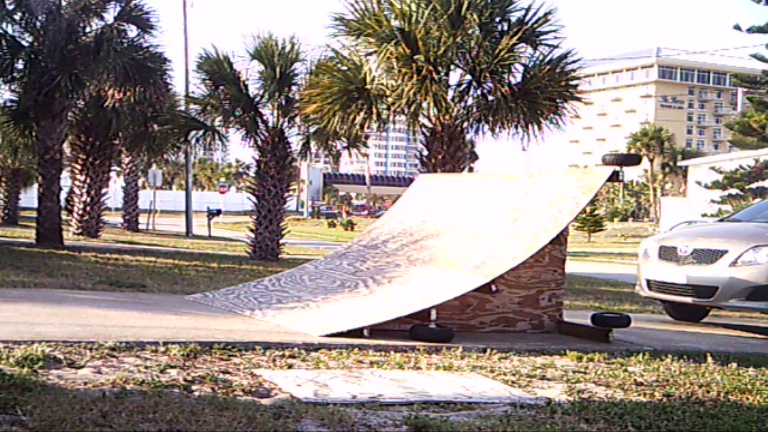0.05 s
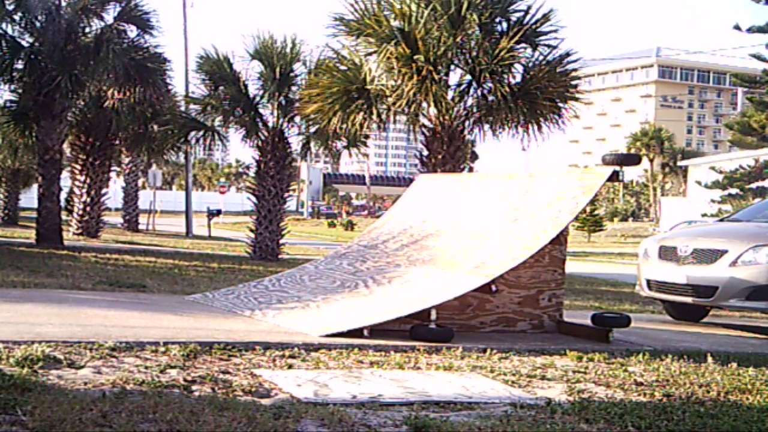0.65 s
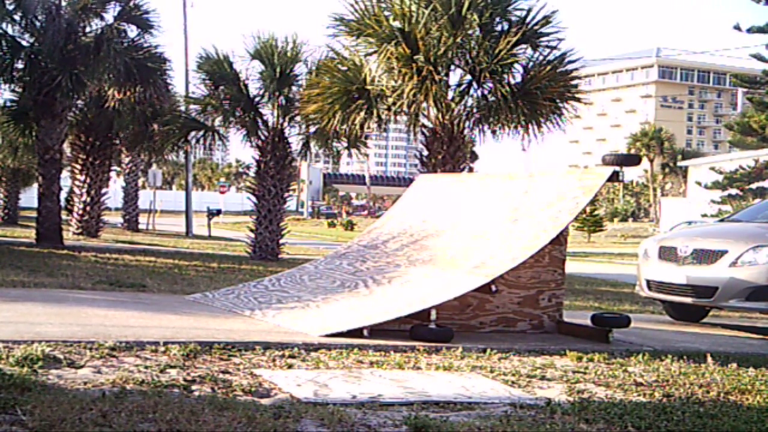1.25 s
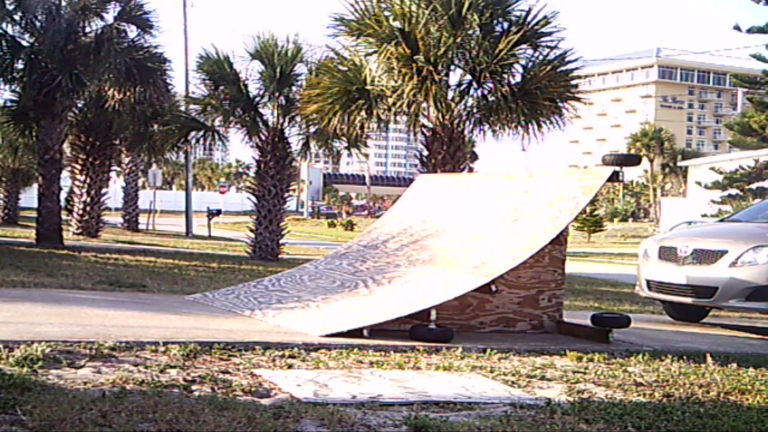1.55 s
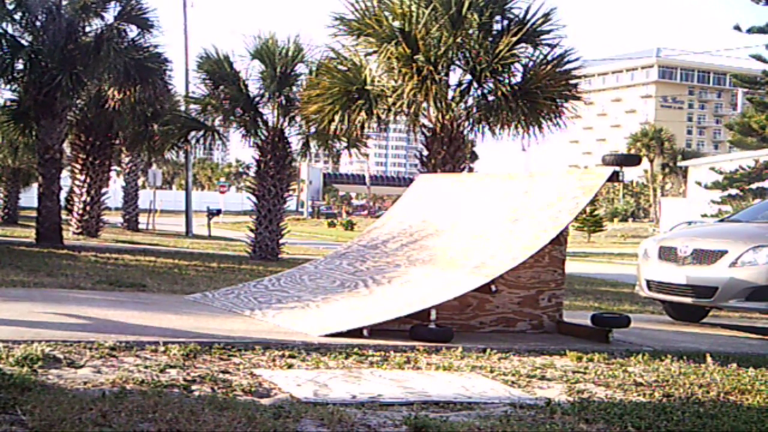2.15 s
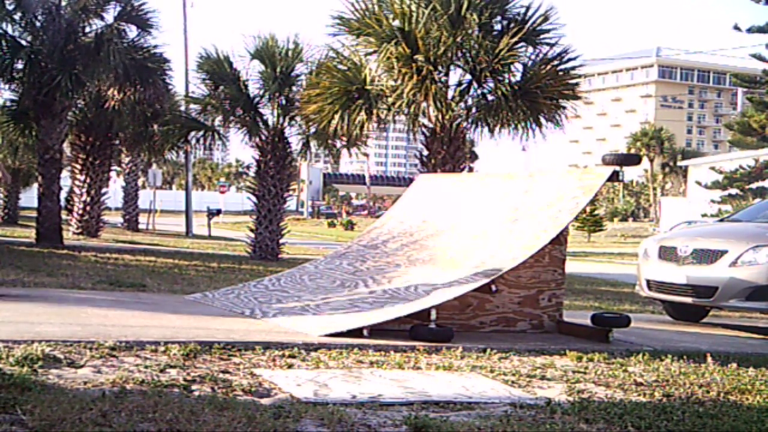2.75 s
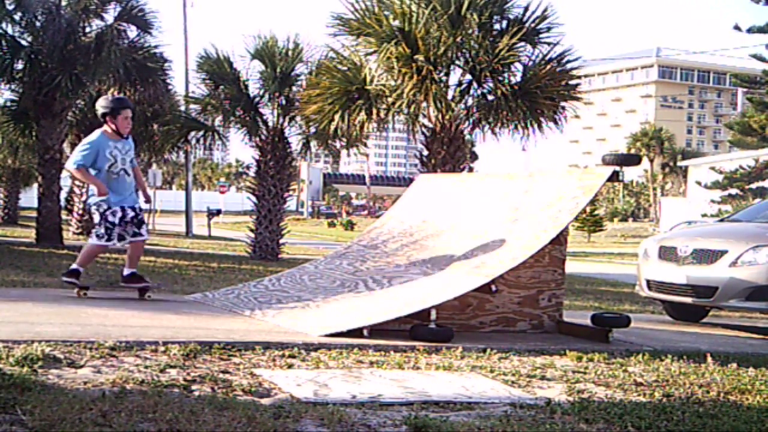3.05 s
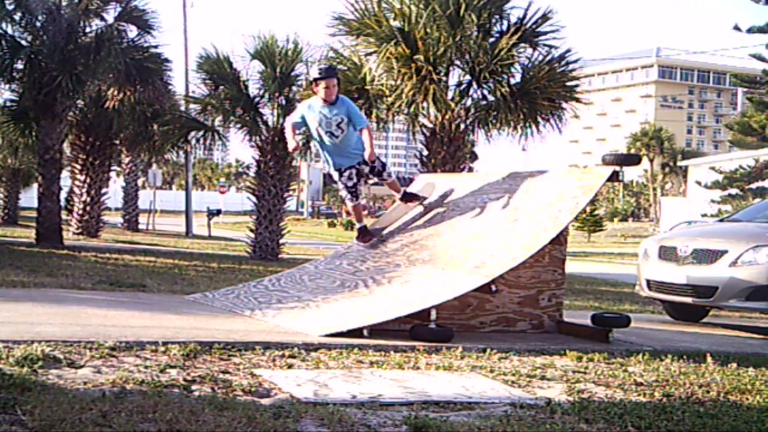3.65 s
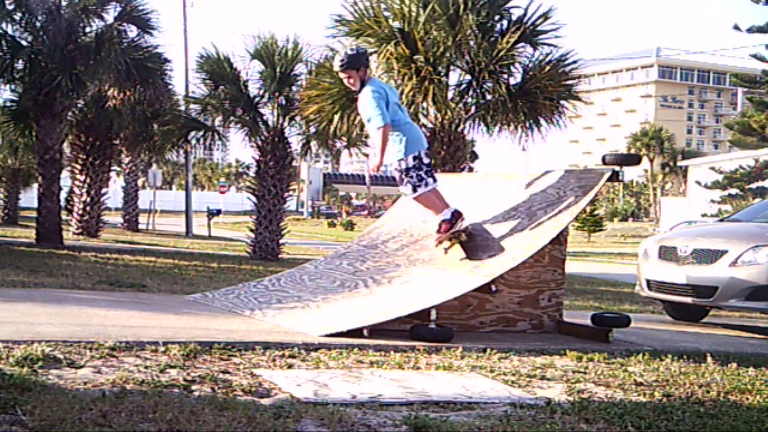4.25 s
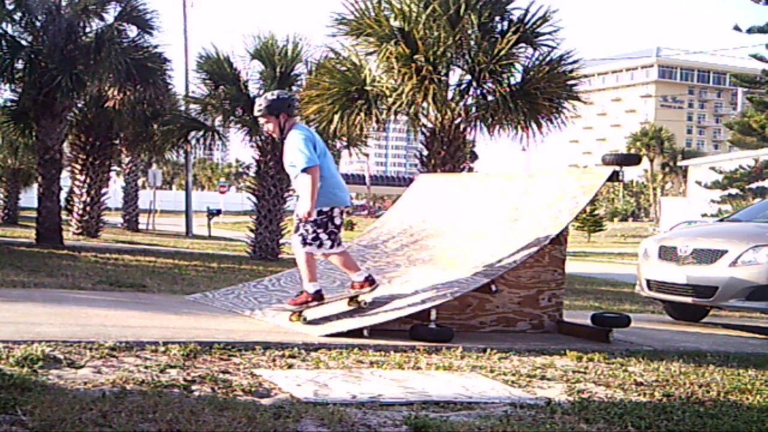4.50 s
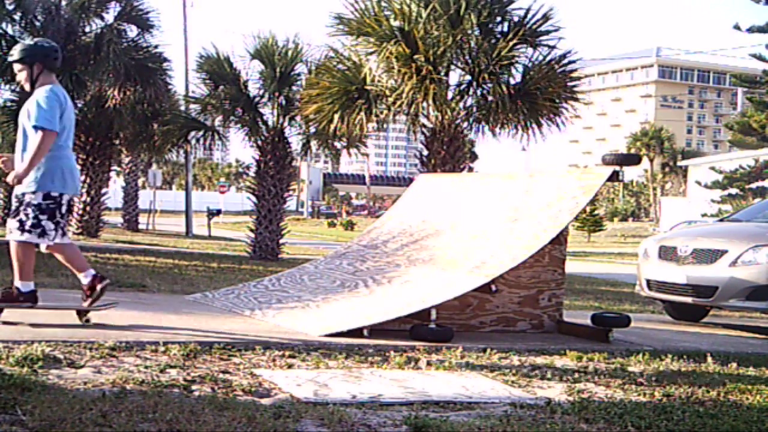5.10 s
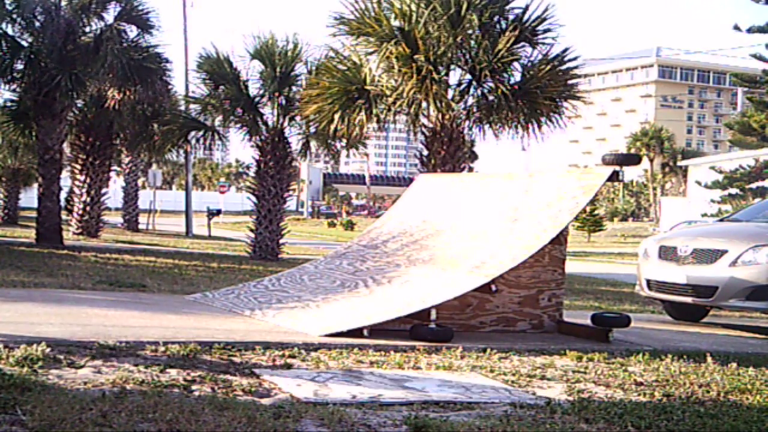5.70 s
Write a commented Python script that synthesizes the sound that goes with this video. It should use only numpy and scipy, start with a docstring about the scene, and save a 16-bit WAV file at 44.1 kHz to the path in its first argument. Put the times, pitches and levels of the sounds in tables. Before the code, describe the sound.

A skateboard rolls closer on concrete, booms up a hollow wooden ramp, turns and clacks back down, with wind buffeting the microphone.

```python
"""You first hear gusts of wind and a far skateboard pushing off along a concrete sidewalk.
It comes closer, climbs a hollow plywood ramp with a big boom, pivots and rolls back past.
Grit shakes the board, louder when it is fast and near; the pushing shoe slaps the ground, and the wheels
and their metal mounts (the trucks) clack at joints and at the ramp's lip. Wind buffets a camera's
microphone over faint traffic, and the camera turns its volume down for a moment after the boom."""
import sys
import numpy as np
from scipy import signal
from scipy.fft import rfft, irfft
from scipy.io import wavfile
from scipy.ndimage import uniform_filter1d

SR = 44100
rng = np.random.default_rng(int(sys.argv[2]) if len(sys.argv) > 2 else 0)


def dump(signal):
    """Clip the signal to [-1, 1] and save it as 16-bit WAV at the path in sys.argv[1]."""
    limited = np.clip(np.atleast_2d(signal).T, -1, 1)
    pcm = np.round(limited * 32767).astype(np.int16)
    wavfile.write(sys.argv[1], SR, pcm)


N = 263277
T = np.arange(N) / SR

# The bright tone of steel bearings and trucks. Each row: frequency in Hz, relative level in dB.
STEEL_TONE = [(2500, -44), (4200, -8.5), (5400, -7), (6400, -4), (6900, -3.5), (7800, 2), (9000, 2),
              (10200, -5.5), (11200, -17.5), (12200, -32)]
# The climb, the pivot on the rear wheels and the way down.
# Each row: start in seconds, end in seconds, load on the wheels in dB, surge on landing in dB.
RAMP_RUNS = [(3.15, 3.88, 5, 0), (3.898, 4.376, 0, 4.5), (4.38, 4.737, -1.5, 1.5)]


def rolling():
    """Far wheels only hum; nearer, grains of concrete shake the board and the bearings sizzle."""
    # The hum of the far wheels. Each row: time in seconds, level in dB.
    hum_levels = [(0, -58.5), (1.15, -53.5), (1.6, -55), (1.72, -49), (2.4, -54.5)]
    # Where the wheels ring. Each row: pitch in Hz, width in Hz, relative level in dB.
    wheel_rings = [(478, 11, 3), (562, 72, 14), (605, 19, 3)]
    # The board's tone on concrete. Each row: frequency in Hz, relative level in dB.
    board_tone = [(100, -6), (200, -7), (340, -0.5), (430, -8.5), (690, -13), (890, -22.5), (1200, -25),
                  (1620, -22.5), (1990, -35), (2310, -30.5), (3400, -37), (4000, -35.5), (5200, -48.5),
                  (11000, -90)]
    hum = curve(hum_levels) * resonate(rng.standard_normal(N), wheel_rings)
    road = grit(per_second=3500, spread_db=2.6) * undb(1.2 * wander(35))
    balls = grit(per_second=3500, spread_db=2.8) * undb(1.7 * wander(70))
    on_concrete = 1 - ramp_contact(RAMP_RUNS[0][0], RAMP_RUNS[-1][1])
    board = colour(road * on_concrete * roll_strength(power=3.03), board_tone, band=(1000, 1900))
    bearings = colour(balls * roll_strength(power=1.3), STEEL_TONE)
    return hum + undb(-53.5) * board + undb(-56.5) * bearings


def roll_strength(power, cruise_m_per_s=3, near_m=5):
    """Rolling noise grows as a power of speed and falls with distance; 1 when cruising nearby."""
    # The board slows up the ramp, almost stops to pivot and speeds up again.
    # Each row: time in seconds, speed in metres a second.
    speeds = [(0.0, 2.3), (2.15, 1.86), (2.32, 2.9), (3.14, 3.05), (3.33, 2.27), (3.54, 2.24), (3.66, .8),
              (3.82, 0.23), (4.04, 0.27), (4.16, 0.89), (4.38, 1.22), (4.51, 3.14), (4.8, 3.16),
              (5.17, 2.37), (5.42, 2.94), (5.97, 2.92)]
    # How far away the board is. Each row: time in seconds, distance in metres.
    distances = [(0.0, 8.7), (2.15, 6.4), (2.33, 5.04), (3.15, 5.28), (4.8, 4.03), (5.97, 5)]
    speed = np.interp(T, *np.transpose(speeds))
    distance = np.interp(T, *np.transpose(distances))
    return (speed / cruise_m_per_s) ** power * near_m / distance


def ramp_rolling(surge_decay_s=.045):
    """Wheels drum the hollow ramp and rasp on its top sheet, with a surge as they land."""
    # The ramp's deep drumming. Each row: frequency in Hz, relative level in dB.
    drum_tone = [(50, 1), (95, -2), (150, 1), (210, 1.5), (260, -7), (345, -8), (480, -10), (660, -22.5),
                 (860, -32), (1500, -45.5)]
    # The rasp of its surface. Each row: frequency in Hz, relative level in dB.
    rasp_tone = [(500, -45), (950, -5.5), (1200, -2), (1700, -2.5), (1950, -4), (2300, 1.5), (3500, 1.5),
                 (4150, -10), (4700, -11), (6000, -35), (11000, -23)]
    # Where the sheet rings. Each row: pitch in Hz, width in Hz, relative level in dB.
    sheet_rings = [(1183, 79, -3.5), (1346, 350, 7), (1670, 150, 1.5), (2200, 340, -4.5), (2550, 170, -7),
                   (3054, 110, -5), (3920, 210, 0)]
    bumps = grit(per_second=900, spread_db=2.0)
    grain = grit(per_second=3500, spread_db=2.2) * undb(1.5 * wander(90))
    load, surge = np.zeros((2, N))
    for start, end, load_db, surge_db in RAMP_RUNS:
        load = np.maximum(load, undb(load_db) * ramp_contact(start, end))
        surge += undb(surge_db) * (T >= start) * np.exp(-since(start) / surge_decay_s)
    drum = colour(bumps * (load * roll_strength(power=.94) + surge), drum_tone, band=(160, 650))
    sheet = resonate(grain * (load * roll_strength(power=1.11) + surge), sheet_rings)
    return undb(-25.5) * drum + undb(-51.5) * colour(sheet, rasp_tone)


def ramp_contact(start, end, release_s=.071):
    """1 while the wheels are on the ramp, dying away after they leave."""
    return (T >= start) * np.exp(-since(end) / release_s)


def ramp_booms(swell_s=.011):
    """The ramp's panels bend under the rider's weight, each giving a short, low note."""
    # The bending panels. Each row: start in seconds, pitch in Hz, peak level in dB.
    booms = [(3.17, 96, -16.5), (3.245, 217.3, -5), (3.927, 199, -22), (4.385, 222, -20), (4.565, 94, -19),
             (4.715, 95.3, -21.5)]
    sound = np.zeros(N)
    for start, hz, db in booms:
        age = since(start)
        swell = age / swell_s * np.exp(1 - age / swell_s)
        sound += undb(db) * swell * np.sin(2 * np.pi * hz * age)
    return sound


def clacks(chatter_s=.0031, ring_s=.003, pebbles_per_s=2.5):
    """Each hit of a wheel, truck or shoe gives a crack, a tick and a knock. Pebbles tick faintly."""
    # Sharp hits: wheels and trucks on joints and edges, and the pushing shoe slapping the ground.
    # Each row: start in seconds, crack in dB, tick in dB, knock in dB, pitch of the ring in Hz.
    hits = [(0.3843, -36, -30.5, -29, 1700), (.626, -50, -43.5, -48, 6340), (0.7938, -36.5, -27, -21, 1700),
            (0.8497, -42, -35, -19, 3170), (1.2027, -59, -45.5, -54, 7640), (1.8468, -44, -53, -54, 1590),
            (2.3213, -33.5, -34, -17, 1250), (2.45, -27.5, -36.5, -19.5, 1550),
            (3.153, -31.5, -35.5, -32, 2670), (3.165, -25, -32, -18, 2590), (3.1857, -35, -47, -12, 1670),
            (3.207, -42, -55, -26, 1250), (3.246, -22, -33.5, -28, 3240), (3.255, -27, -48, -17, 1210),
            (3.437, -25.5, -52, -35, 3170), (3.5362, -32, -45, -35, 2710), (3.612, -41, -50, -31, 6400),
            (3.8976, -26.5, -35, -19, 1220), (3.9224, -32, -50, -43, 7600), (4.382, -26, -32.5, -20, 6400),
            (4.51, -32, -62, -21, 2790), (4.572, -41, -40, -29, 1680), (4.649, -33.5, -37, -15, 3440),
            (4.7729, -20, -25.5, -13.5, 1250), (5.593, -31.5, -37, -14, 1590),
            (5.7622, -37, -36, -14.5, 1580), (5.7732, -34.5, -32.5, -23, 7940),
            (5.9223, -26.5, -31.5, -8, 1900)]
    # The notes of the wooden deck. Each row: pitch in Hz, relative level in dB, seconds to fade 60 dB.
    deck_notes = [(181, 2.5, 0.06), (308, -3, 0.041), (384, 7, 0.038), (519, 3.5, 0.04), (663, -4.5, 0.1),
                  (696, -9, 0.032)]
    # The sharp crack. Each row: frequency in Hz, relative level in dB.
    crack_tone = [(300, -10), (660, 14.5), (850, -21), (1020, -8), (1250, 9.5), (1750, 7), (1980, 0.5),
                  (2350, 2), (3350, -3), (3950, 2.5), (4400, -5), (7000, -63), (11000, -62)]
    age = T[:SR // 4]
    chatter_fade = np.exp(-age / chatter_s)
    knock = sum(undb(db - 60 * age / fade_s) * np.sin(2 * np.pi * hz * age)
                for hz, db, fade_s in deck_notes)
    knock /= np.abs(knock).max()
    crack, tick, body = np.zeros((3, N + len(age)))
    for start, crack_db, tick_db, knock_db, ring_hz in hits:
        span = slice(int(start * SR), int(start * SR) + len(age))
        chatter = chatter_fade * rng.choice([-1, 1], (2, len(age)))
        crack[span] += undb(crack_db) * chatter[0]
        tick[span] += undb(tick_db) * chatter[1]
        # where the blow lands picks out one short ring
        ring = np.exp(-age / ring_s) * np.sin(2 * np.pi * ring_hz * age)
        body[span] += undb(knock_db) * knock + undb(crack_db - 2) * ring
    pebble_hits = rng.random(N) < pebbles_per_s / SR
    pebble_fades = signal.fftconvolve(pebble_hits, chatter_fade)[:N]
    pebbles = undb(-53.5) * pebble_fades * rng.choice([-1, 1], N)
    return colour(crack[:N] + pebbles, crack_tone) + colour(tick[:N] + pebbles, STEEL_TONE) + body[:N]


def scuffs(rise_s=.0013, decay_s=.041):
    """Shoes and sliding wheels slap the ground, then scrape; the gritty treble dies first."""
    # The scrapes. Each row: start in seconds, level in dB, level of the treble in dB.
    scrapes = [(0.385, -35, -41.5), (.629, -47, -60), (0.795, -33.5, -38), (2.307, -42, -50),
               (3.925, -44, -46), (4.785, -37, -62), (5.767, -36.5, -46), (5.879, -37.5, -40.5),
               (5.935, -44, -46)]
    # The dull slap of a shoe's sole. Each row: frequency in Hz, relative level in dB.
    sole_tone = [(200, -10.5), (650, 9.5), (950, -6.5), (1750, -1.5), (2100, -12.5), (3300, -18),
                 (5000, -35), (7000, -17), (11000, -31)]
    # The bright scratch of sand. Each row: frequency in Hz, relative level in dB.
    sand_tone = [(2500, -10), (4400, -10), (5200, -4), (6400, 3.5), (7200, -13), (8800, -3.5), (10200, -5),
                 (12200, -21)]
    body, treble = np.zeros((2, N))
    for start, db, treble_db in scrapes:
        age = since(start)
        attack = 1 - np.exp(-age / rise_s)
        body += undb(db) * attack * np.exp(-age / decay_s)
        treble += undb(treble_db) * attack * np.exp(-2 * age / decay_s)
    coarse = grit(per_second=5000, spread_db=2)
    fine = grit(per_second=7000, spread_db=2.4)
    return colour(body * coarse, sole_tone) + colour(treble * fine, sand_tone)


def wind(eddies_per_s=3, eddy_hz=98, churn_db_per_octave=9.5):
    """Gusts rumble on the microphone, strong ones churn brightly, and eddies (swirls of air) thump."""
    # The wind's strength. Each row: time in seconds, relative level in dB.
    gust_levels = [(0.0, -18), (.1, -35.5), (.2, -24.5), (.58, -28.5), (.72, -22), (.92, -20.5),
                   (1.22, -32.5), (1.42, -23), (2.2, -26), (2.48, -22.5), (3.25, -24.5), (3.45, -31.5),
                   (3.93, -24), (4.5, -25.5), (4.9, -32), (5.22, -30), (5.33, -25), (5.97, -28)]
    # Low thumps: wind buffeting the microphone, and last the thud of a foot or the board.
    # Each row: time in seconds, peak level in dB, frequency in Hz.
    low_thumps = [(.169, -11, 40), (.255, -20, 190), (.275, -23.5, 149), (.488, -26.5, 180),
                  (.806, -20, 171), (.877, -19, 175), (.941, -20.5, 155), (1.055, -10.5, 60),
                  (1.439, -14.5, 210), (1.692, -18, 158), (1.862, -10.5, 31), (2.23, -21.5, 124),
                  (3.055, -14, 112), (3.945, -13, 65), (4.24, -12.5, 126), (5.327, -16.5, 140),
                  (5.926, -7.5, 121)]
    # The low rumble. Each row: frequency in Hz, relative level in dB.
    rumble_tone = [(8, 8), (28, -1), (55, -4), (100, -10), (200, -21), (400, -50), (900, -64)]
    # The churning air. Each row: frequency in Hz, relative level in dB.
    churn_tone = [(40, 2.5), (130, 1.5), (250, -0.5), (450, -10), (800, -24.5), (1600, -41), (5000, -60)]
    gust = curve(gust_levels)
    rumble = undb(2) * gust * colour(rng.standard_normal(N), rumble_tone)
    flutter = undb(2.8 * wander(30))
    churn = undb(-10.5) * gust * (gust / undb(-19)) ** .5 * flutter
    air = rng.standard_normal(N)
    # small eddies come at random and follow the wind's strength
    moments = T[rng.random(N) < eddies_per_s / SR]
    octaves = np.interp(moments, T, rng.uniform(-.29, .5, N))
    peaks_db = np.interp(moments, *np.transpose(gust_levels)) + 1.5
    small_eddies = zip(moments, peaks_db, eddy_hz * 2 ** octaves)
    for moment, db, hz in [*low_thumps, *small_eddies]:
        cycles = (T - moment) * hz
        pulse = undb(db) * np.exp(-(2 * cycles) ** 2)
        rumble += pulse * np.cos(2 * np.pi * cycles)
        churn += undb(-10.5 + churn_db_per_octave * np.log2(hz / eddy_hz)) * pulse  # quicker churns more
    return rumble + colour(churn * air, churn_tone)


def traffic():
    """Far traffic blends into a low murmur that slowly swells and sinks."""
    # The murmur's tone. Each row: frequency in Hz, relative level in dB.
    traffic_tone = [(60, 15), (250, 5), (450, -11.5), (600, -10), (880, -16), (1250, -19), (1700, -9),
                    (2100, -21), (3300, -21), (4700, -25), (6400, -19), (9300, -42), (10500, -26.5),
                    (12000, -54)]
    return colour(rng.standard_normal(N), traffic_tone) * undb(-46.5 + .36 * wander(1.5))


def camera_noise(whine_hz=7792):
    """The microphone hisses softly and the camera gives off a thin whine."""
    # The microphone's own hiss. Each row: frequency in Hz, relative level in dB.
    hiss_tone = [(4000, -12.5), (5400, -5), (7800, -2), (9000, -1.5), (10200, -2.5), (12200, -27)]
    hiss = colour(rng.standard_normal(N), hiss_tone)
    whine = unit_level(np.sin(2 * np.pi * whine_hz * T))
    return undb(-69) * hiss + undb(-74.5) * whine


def outdoors(x, echo_db, fade_s):
    """Add sparse, dull echoes from the ramp, trees and houses."""
    surfaces = grit(per_second=2500, spread_db=1)
    echoes = surfaces * undb(-60 * T / fade_s) * (T > .008)
    echoes = signal.sosfilt(signal.butter(1, 4000, fs=SR, output="sos"), echoes[:SR // 2])
    return x + undb(echo_db) * signal.fftconvolve(x, echoes / np.linalg.norm(echoes))[:N]


def gain_control(x, limit_db, duck_db, recover_db_per_s):
    """A sound that stays too loud turns the volume down a moment later; it then creeps back."""
    power = uniform_filter1d(x ** 2, size=640, origin=319)  # average of the last 15 ms
    overload = np.roll(power > undb(limit_db) ** 2, 300)  # reacts 7 ms late
    last_overload = np.maximum.accumulate(np.where(overload, T, -np.inf))
    cut_db = np.maximum(duck_db - recover_db_per_s * (T - last_overload), 0)
    return x * undb(-cut_db)


def grit(per_second, spread_db):
    """Tiny impacts at random moments, a few much harder than the rest."""
    hit = rng.random(N) < per_second / SR
    hardness = np.minimum(rng.exponential(size=N), 5)
    return unit_level(hit * rng.choice([-1, 1], N) * undb(spread_db * hardness))


def wander(per_second):
    """A smooth random drift, about 1 in size."""
    drift = np.interp(T * per_second, np.arange(2048), rng.standard_normal(2048))
    return unit_level(uniform_filter1d(drift, int(SR / per_second) // 2))


def resonate(x, rings):
    """Make a sound ring at several pitches at once; white noise keeps about the same power."""
    power = sum(np.pi * width / SR * undb(2 * db) for hz, width, db in rings)
    bands = [undb(db) * signal.lfilter(*signal.iirpeak(hz, hz / width, fs=SR), x)
             for hz, width, db in rings]
    return sum(bands) / np.sqrt(power)


def colour(x, tone, band=(0, SR / 2), size=8192):
    """Filter a sound to a tone table; white noise of level 1 comes out at level 1 inside the band."""
    hz, db = np.transpose(tone)
    freqs = np.maximum(np.arange(size // 2 + 1) * SR / size, 1)
    octaves_outside = np.maximum(np.log2(hz[0] / freqs), 0) + np.maximum(np.log2(freqs / hz[-1]), 0)
    gain = undb(np.interp(np.log(freqs), np.log(hz), db) - 10 * octaves_outside)
    gain /= np.sqrt(np.mean(gain ** 2 * (freqs >= band[0]) * (freqs <= band[1])))
    # fold the filter so that it rings only after a hit, never before
    cepstrum = irfft(np.log(gain))
    cepstrum[1:size // 2] *= 2
    cepstrum[size // 2 + 1:] = 0
    return signal.fftconvolve(x, irfft(np.exp(rfft(cepstrum))))[:N]


def curve(levels):
    """Join rows of seconds and dB with straight lines, as a gain."""
    return undb(np.interp(T, *np.transpose(levels)))


def since(start):
    """Seconds since a moment, zero before it."""
    return np.maximum(T - start, 0)


def undb(db):
    """Turn decibels into a gain to multiply by."""
    return 10 ** (np.asarray(db) / 20)


def unit_level(x):
    """Scale to an average (rms) level of 1."""
    return x / np.sqrt(np.mean(x ** 2))


def scene():
    """The skateboard, with echoes of its clacks and scuffs, over wind, traffic and camera noise."""
    blows = outdoors(clacks() + scuffs(), echo_db=-13, fade_s=.38)
    skateboard = rolling() + ramp_rolling() + ramp_booms() + blows
    return (skateboard + wind() + traffic() + camera_noise())[None]


def record(dry):
    """The camera turns down when overloaded, rounds the tallest peaks and cuts the highest treble."""
    held = gain_control(dry[0], limit_db=-9, duck_db=8, recover_db_per_s=7)
    treble_cut = signal.ellip(8, .2, 80, 11700, fs=SR, output="sos")
    return signal.sosfilt(treble_cut, np.tanh(held))[None]


dry = scene()
out = record(dry)
dump(out)
```